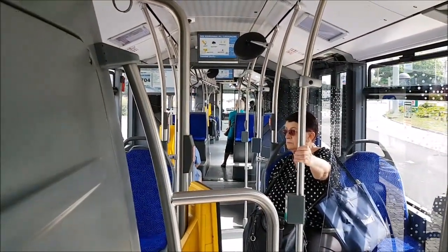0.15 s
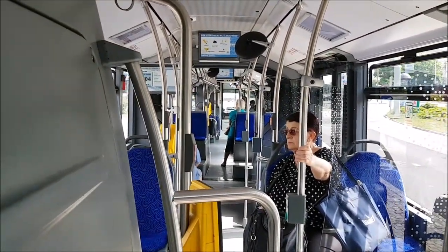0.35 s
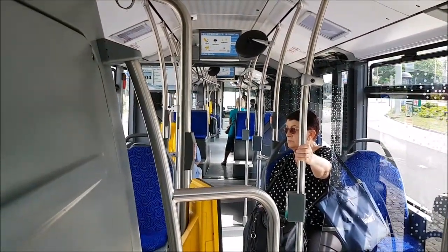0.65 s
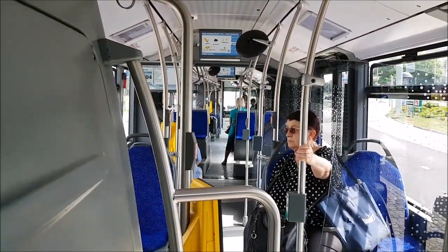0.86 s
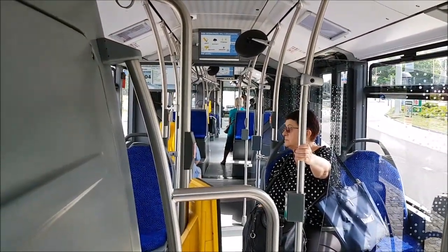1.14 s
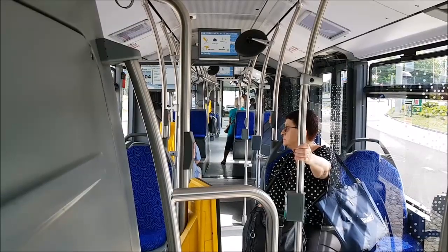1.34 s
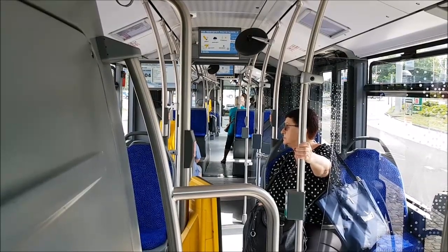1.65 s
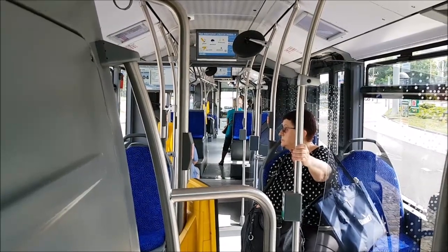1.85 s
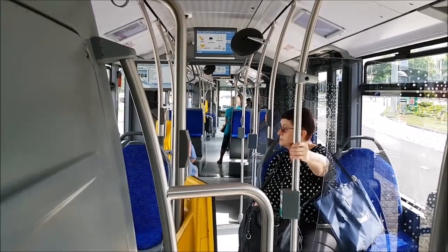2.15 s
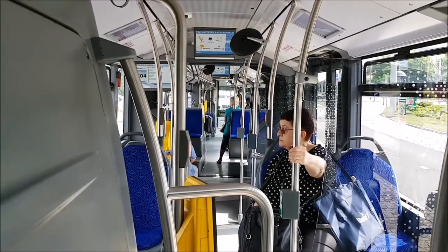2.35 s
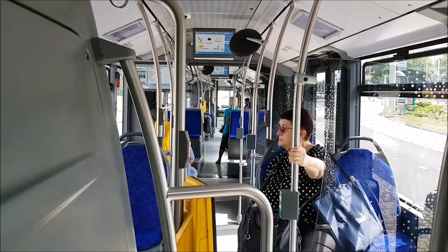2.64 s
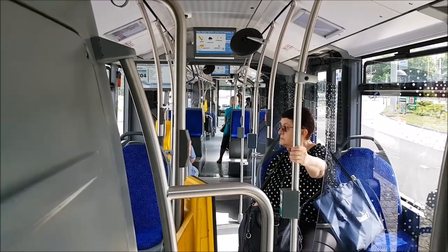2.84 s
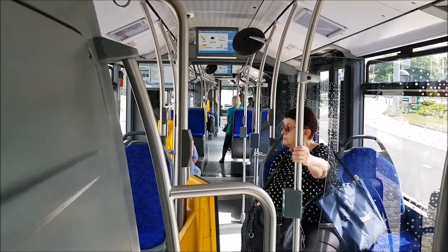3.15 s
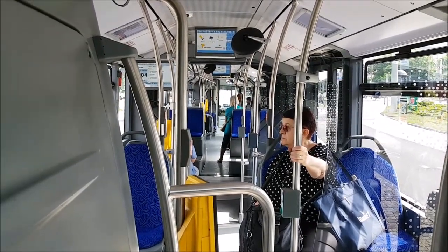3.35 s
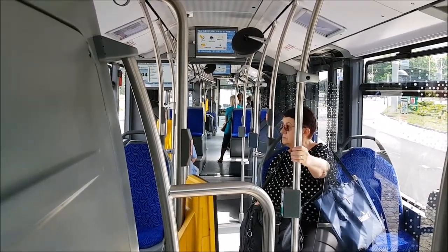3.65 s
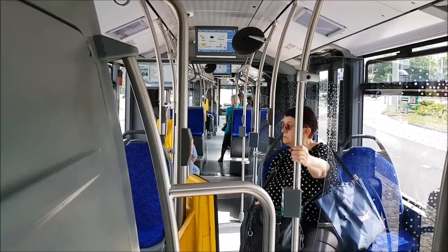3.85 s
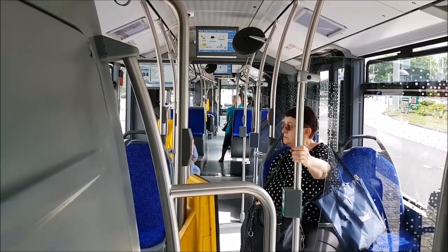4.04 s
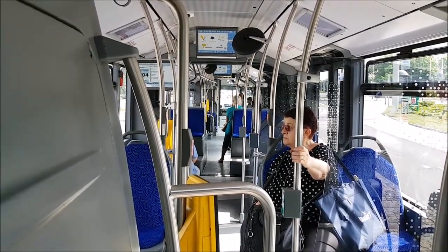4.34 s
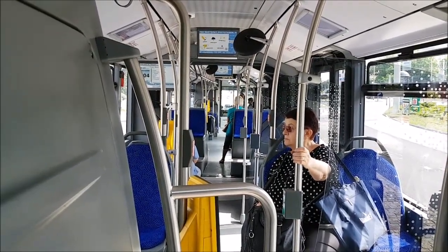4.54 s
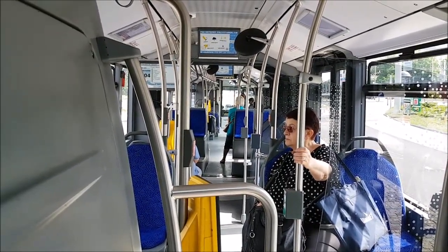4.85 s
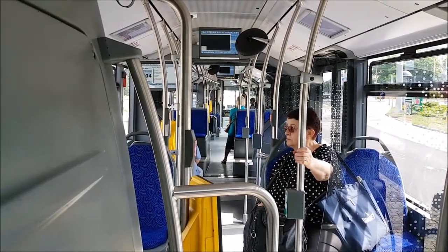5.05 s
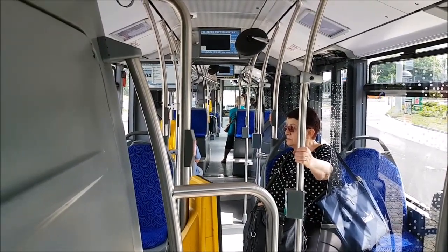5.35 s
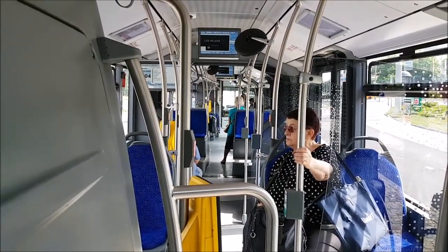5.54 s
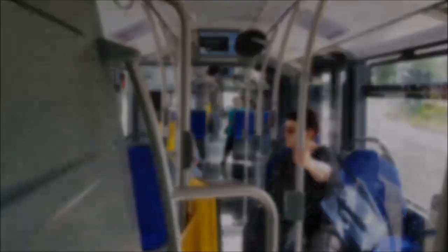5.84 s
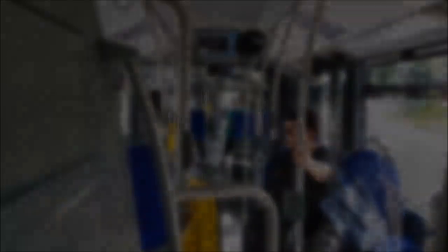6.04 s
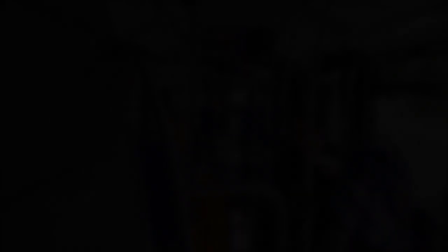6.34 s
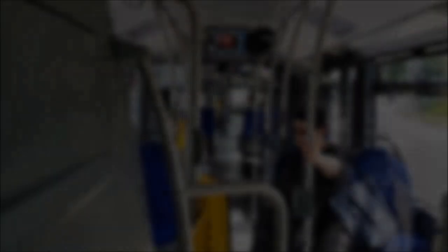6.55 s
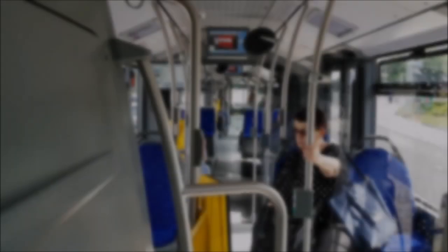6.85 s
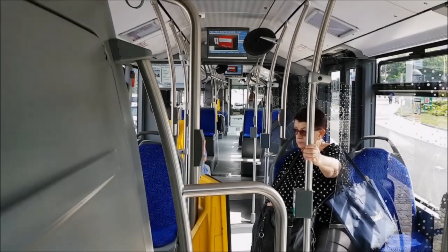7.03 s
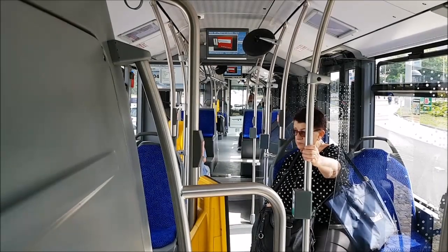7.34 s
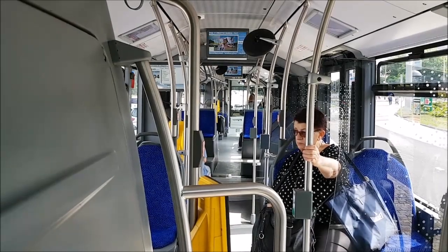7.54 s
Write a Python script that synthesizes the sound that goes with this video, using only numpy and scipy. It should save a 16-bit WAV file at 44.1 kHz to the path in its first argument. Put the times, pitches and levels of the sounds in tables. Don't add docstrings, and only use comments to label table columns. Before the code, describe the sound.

Inside an idling city bus, a steady diesel hum and fan whine with panel knocks fade down, then driving rumble and hard bumps return.

```python
import sys
import numpy as np
from scipy import signal
from scipy.fft import rfft, irfft, next_fast_len
from scipy.io import wavfile
from scipy.ndimage import uniform_filter1d, map_coordinates

SR = 44100
rng = np.random.default_rng(int(sys.argv[2]) if len(sys.argv) > 2 else 0)


def wav_record(signal):
    frames = np.transpose(np.atleast_2d(signal))
    bounded = np.clip(frames, -1, 1)
    quanta = np.round(bounded * 32767).astype(np.int16)
    wavfile.write(sys.argv[1], SR, quanta)


def boost(x):
    u = np.asarray(x, float) / 20
    return 10 ** u


N = 339129
BELT = 1.0585

# time in seconds, turns per second.
SHAFT = [(0, 14.86), (.75, 14.74), (1.55, 14.73), (2.3, 14.98), (3.1, 14.84), (3.9, 14.83), (4.8, 14.74),
         (5.45, 14.88), (6.6, 14.83), (6.9, 14.65)]
# time in seconds, gain in dB.
FADER = [
    (0, 0),
    (4.5, 0),
    (5.3, -2.5),
    (6.2, -8),
    (6.6, -7.5),
    (7.1, -4),
    (7.69, 0.5),
]


def curves(rows):
    s, *cols = np.transpose(rows)
    return [np.interp(np.arange(N) / SR, s, c) for c in cols]


def wobble(rate):
    points = rng.standard_normal(int(N * rate / SR) + 4)
    return map_coordinates(points, [np.arange(N) * rate / SR])


def bells(rows):
    t = np.arange(N) / SR
    return sum(height * np.exp(-((t - s) / half) ** 2) for s, height, half in rows)


def step(start_s, takes_s):
    return np.clip((np.arange(N) / SR - start_s) / takes_s, 0, 1)


def driving():
    return step(6.83, 0.24)


def turned(hz):
    return 2 * np.pi * np.cumsum(hz) / SR


def tone(angle, db, pan_db, lead):
    ports = np.array([[.5], [-.5]])
    return np.sqrt(2) * boost(db + ports * pan_db) * np.sin(angle + ports * lead)


def along(points, hz):
    f, db = np.transpose(points)
    octaves_above = np.log2(np.maximum(hz / f[-1], 1))
    octaves_below = np.log2(np.maximum(f[0] / (hz + 1), 1))
    return np.interp(np.log(hz + 1), np.log(f + 1), db) - 55 * (octaves_above + octaves_below)


def lifts(rings, hz):
    return sum(db / (1 + (2 * (hz - centre_hz) / width) ** 2) for centre_hz, width, db in rings)


def filtered(x, response):
    m = next_fast_len(N + SR // 2)
    return irfft(rfft(x, m) * response(np.fft.rfftfreq(m, 1 / SR)), m)[..., :N]


def rush(shared, apart, patchy_db):
    # pitch in Hz, width in Hz, lift in dB.
    shared_rings = [(76, 7.2, -5), (347, 19, -3.5), (450.6, 28, 4), (496, 27, -8), (596, 13, -2.5),
                    (724, 49, 3), (907.6, 16, 6.5), (990, 65, -1.5), (1141, 88, 4), (1318, 47, 5.5),
                    (1483, 110, -2.5), (1775, 35, 5), (1915, 110, 1.5), (2420, 21, 5.5), (3500, 1300, 3.5),
                    (4600, 40, 4.5), (5530, 72, 3), (5800, 27, 3)]
    apart_rings = [(668, 25, 4), (785, 30, 8), (1080, 35, 5), (1200, 45, 4.6), (1324, 25, 4), (1464, 35, 4),
                   (1775, 40, 6), (1890, 90, 4), (2110, 38, 4), (2358, 50, 5), (2562, 30, 5), (5556, 80, 4)]
    z = signal.stft(rng.standard_normal((2, N)), nperseg=512)[2]
    patches = uniform_filter1d(rng.standard_normal(z.shape[1:]), size=6, axis=0)
    patches = uniform_filter1d(patches, size=14, axis=1)
    pair = signal.istft(z * boost(patchy_db * patches / patches.std()), nperseg=512)[1][:, :N]

    def colour(hz):
        mid_db = along(shared, hz) + lifts(shared_rings, hz)
        side_db = along(apart, hz) + lifts(apart_rings, hz)
        return np.sqrt(SR / 2) * boost([mid_db, side_db])

    mid, side = filtered(pair, colour)
    return np.array([mid + side, mid - side])


def cabin():
    # pitch in Hz, level in dB per Hz.
    shared = [(14, -64), (22, -59.5), (55, -48.5), (85, -54.5), (200, -53.5), (270, -56.5), (385, -53),
              (420, -59), (750, -66), (1020, -73.5), (1900, -79), (3000, -91.5), (5000, -102), (6500, -112)]
    apart = [(20, -75.5), (80, -77), (200, -67), (270, -68.5), (385, -61), (500, -69.5), (800, -75.5),
             (1150, -73.5), (1500, -75.5), (2000, -83.5), (3000, -89.5), (4500, -95.5), (6000, -111),
             (7000, -122)]
    hiss = [(5000, -135), (8000, -124.5), (12000, -116.5), (15800, -112.5)]
    hiss_apart = [(5000, -138), (9000, -126), (12000, -121.5), (15800, -116)]
    noise = rush(shared, apart, patchy_db=0.82) * boost([[.4], [-.4]])
    low = filtered(noise, lambda hz: 1 / (1 + (hz / 300) ** 4))
    rumble_db = -2.5 + 5.5 * driving()
    throb = 1 + 0.024 * np.sin(3 * turned(curves(SHAFT)[0]) / BELT)
    body = boost(rumble_db) * low + throb * (noise - low)
    return boost(curves(FADER)[0] + 0.51) * (body + rush(hiss, hiss_apart, patchy_db=-0.5))


def whistle():
    # time in seconds, pitch in Hz.
    pitch = [(0, 5520), (.7, 5530), (1.3, 5590), (2.3, 5580), (2.8, 5520), (3.9, 5560), (5.2, 5580),
             (5.9, 5550), (6.6, 5590), (7.69, 5620)]
    db = -82 + curves(FADER)[0] + 2.5 * wobble(4) + 1.5 * wobble(20)
    return tone(turned(curves(pitch)[0] + 8 * wobble(25)), db, pan_db=-2, lead=1.5)


def squeak():
    s, db, hz, length = (1.748, -68, 5880, .018)
    t = np.arange(N) / SR
    return boost(db) * np.exp(-((t - s) / length) ** 2) * np.sin(2 * np.pi * hz * t)


def knocks():
    # time in seconds, blow in dB, rattle in dB, rattle length in seconds.
    hits = [
        (.1825, -21, -50, .012),
        (.1862, -17, -52, .012),
        (.8895, -19, -50, .025),
        (1.909, -28, -51, .025),
        (.566, -24, -70, .01),
        (1.851, -25, -62, .015),
        (3.092, -24, -64, .01),
        (4.328, -25, -66, .01),
        (7.145, -32, -60, .02),
    ]
    # pitch in Hz, level in dB, time to fade by 60 dB in seconds.
    panel = [(370, 0, .035), (600, -1, .055), (1300, -14, .035), (1650, -19, .04), (2000, -22, .03)]
    t = np.arange(SR // 10) / SR
    ring = sum(boost(db - 60 * t / t60) * np.sin(2 * np.pi * hz * t) for hz, db, t60 in panel)
    ring = ring * (1 - np.exp(-t / 0.00047))
    blows, rattle = np.zeros(N + SR), np.zeros((2, N + SR))
    for s, db, rattle_db, length in hits:
        at = round(s * SR)
        blows[at:at + len(t)] += boost(db) * ring
        swell = t / length * np.exp(1 - t / length * 2)
        rattle[:, at:at + len(t)] += boost(rattle_db) * swell * rng.standard_normal((2, len(t)))

    def bright(hz):
        return boost(along([(1200, 8), (3000, 4), (6000, -6), (8000, -20), (15800, -13)], hz))

    return blows[:N] * boost([[1.5], [-1.5]]) + 2.2 * filtered(rattle[:, :N], bright)


def bumps():
    # time in seconds, peak in dB, pitch in Hz, time to fade by 60 dB in seconds, direction.
    thumps = [
        (6.74, -30, 58, .4, 1),
        (7.13, -24, 52, .5, 1),
        (7.405, -24, 60, .1, 1),
        (7.59, -20, 45, .3, 1),
        (7.609, -5, 130, .018, 1),
        (7.646, -8, 75, .05, -1),
        (7.671, -13, 60, .05, 1),
    ]
    t = np.arange(N) / SR
    out = np.zeros(N)
    for s, db, hz, t60, way in thumps:
        u = np.maximum(t - s, 0)
        out += way * boost(db - 60 * u / t60) * (1 - np.exp(-u / 0.0024)) * np.sin(2 * np.pi * hz * u)
    return out


def valve():
    # time in seconds, rise in dB, half length in seconds.
    sings = [(.4, 5, .3), (.85, 8, .25), (1.3, 10, .3), (2.3, 8, .3)]
    db = -61 + bells(sings) + curves(FADER)[0] + 1.5 * wobble(11)
    return tone(126 * turned(curves(SHAFT)[0]) + .5 * wobble(8), db, pan_db=0, lead=2.2)


def drone():
    start_s, lasts_s = 6.65, .85
    u = np.clip(np.arange(N) / SR - start_s, 0, lasts_s)
    sounding = step(start_s, 0.034) - step(start_s + lasts_s - .2, 0.29)
    hz = 192 - 8 * u + 2.5 * wobble(12)
    return sounding * tone(turned(hz), -36.5 + 11.5 * u + 1.5 * wobble(14), pan_db=0.5, lead=.1)


def gears():
    start_s = 6.5
    hz = 211 + 35 * np.maximum(np.arange(N) / SR - start_s, 0)
    return step(start_s, .25) * tone(turned(hz), -41, pan_db=5.5, lead=1.2)


def whine():
    # time in seconds, depth in dB, half length in seconds.
    dips = [(.57, 2.5, 0.12), (1.07, 2.5, .12), (1.62, 6, .12), (2, 4, 0.062), (2.33, 3, .12),
            (2.9, 1.2, 0.34), (4.18, 8, .25), (6.64, 9, 0.044), (7.14, 6, .05), (7.49, 6, .04)]
    # time in seconds, share 0 to 1, half length in seconds.
    opposed = [(.63, .8, .05), (1.15, .7, .12), (1.8, .85, .3), (2.65, .9, .15), (4.2, 1, .5)]
    t = np.arange(N) / SR
    dip_db = bells(dips)
    ease_db = 2.5 * np.maximum(t - 4.64, 0)
    db = -31.8 - dip_db - ease_db + curves(FADER)[0] + 1.6 * wobble(18)
    hz = 1740 - .9 * dip_db + 1.2 * wobble(5) + 2.5 * wobble(22)
    askew = 1 - bells(opposed)
    pan_db = askew * (1.5 - .35 * t) + .6 * wobble(30)
    return tone(turned(hz), db, pan_db, np.pi + askew * .16 + .07 * wobble(30))


def hum():
    # multiple of the shaft rate, level in dB, left-right difference in dB, left lead in radians.
    compressor = [(4, -30, -1, 0), (8, -49, 2, .2), (9, -49, 0, .1), (10, -34, -1, -.1), (11, -45, 0, .1),
                  (12, -36, 1, .1), (13, -31, 1, 0), (14, -37, 5, .3), (15, -47, -7, .1), (16, -44, -1, 0),
                  (18, -46, 1, .1), (22, -48, 0, .6), (23, -47, 1, 1), (24, -35, 3, .4), (25, -45, 5, .8),
                  (27, -41, 2, .3), (33, -54, -2, .8), (38, -53, -4, -.7), (44, -49, 1, .2),
                  (50, -50, 1, .2), (105, -63, 0, .3)]
    engine = [(2, -37, -1, -.1), (3, -37, 0, 0), (7, -46, 1, .1), (8, -35, 1, 0), (9, -46, 1, 0),
              (16, -45, 2, .3), (20, -43, 2, 0), (22, -48, 1, .2), (23, -48, 0, .1), (27, -43, 2, .2),
              (28, -47, 5, .1), (31, -48, 0, .2), (34, -49, -1, -.7), (36, -53, 1, -.4), (42, -48, 1, -.7),
              (48, -54, 1, 1)]
    angle = turned(curves(SHAFT)[0])
    out = np.zeros((2, N))
    for orders, turn in ((compressor, angle), (engine, angle / BELT)):
        for order, db, pan_db, lead in orders:
            drift = 2 * np.pi * rng.random() + .006 * order * wobble(4)
            level_db = db + 1.2 * wobble(2.983) + 1.6 * wobble(9)
            out += tone(round(order) * turn + drift, level_db, pan_db, lead)
    return boost(0.08 + 1.09 * curves(FADER)[0] - 18 * driving()) * out


def scene():
    background = cabin() + whistle() + squeak() + knocks() + bumps()
    return background + valve() + drone() + gears() + whine() + hum()


def top_cut(x):
    return signal.sosfilt(signal.butter(12, 15720, fs=SR, output="sos"), x)


def record(dry):
    return top_cut(dry)


dry = scene()
out = record(dry)
wav_record(out)
```